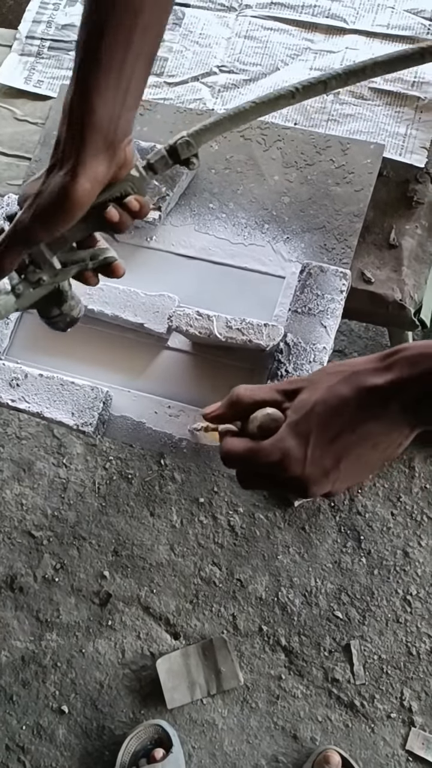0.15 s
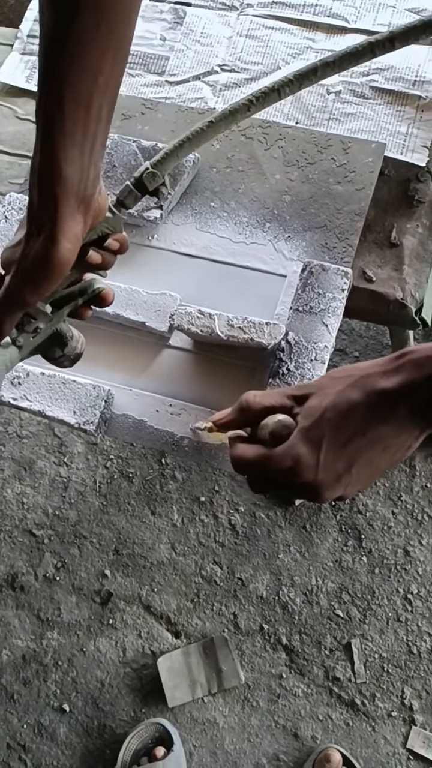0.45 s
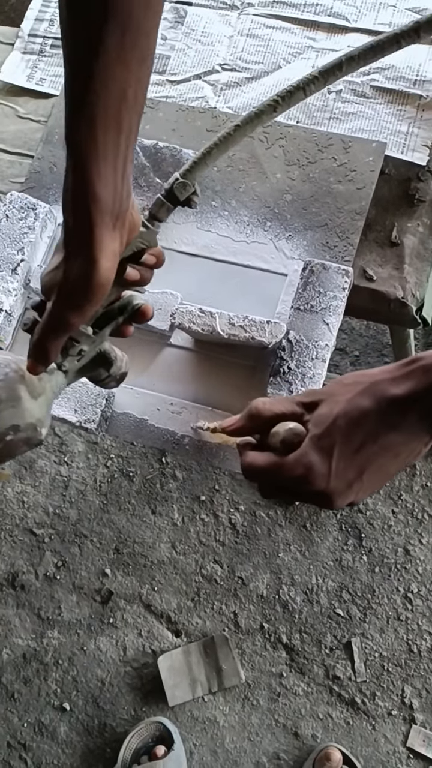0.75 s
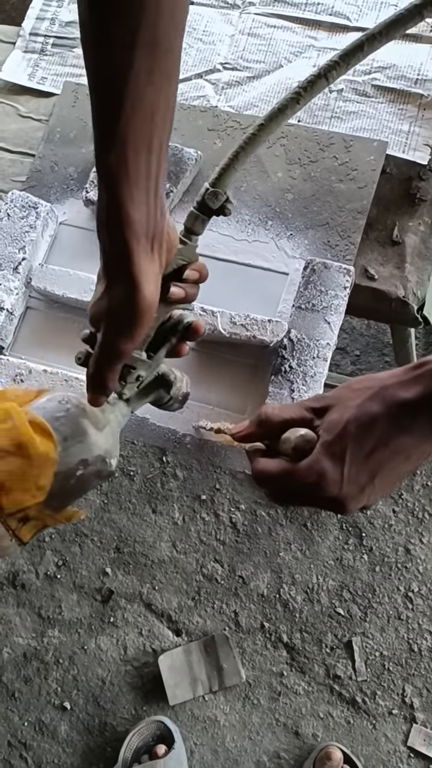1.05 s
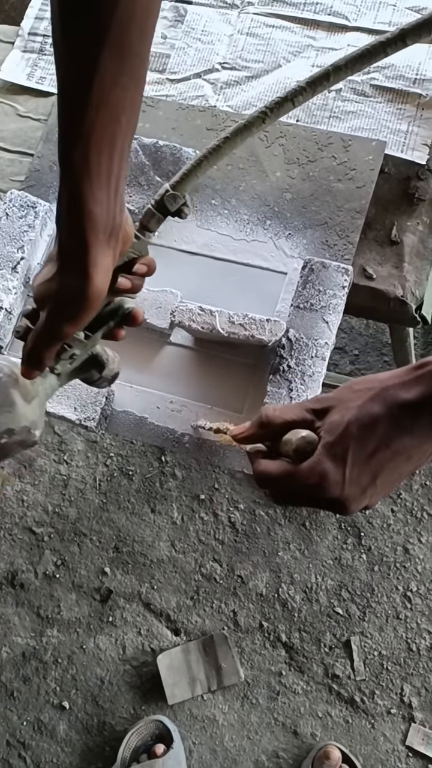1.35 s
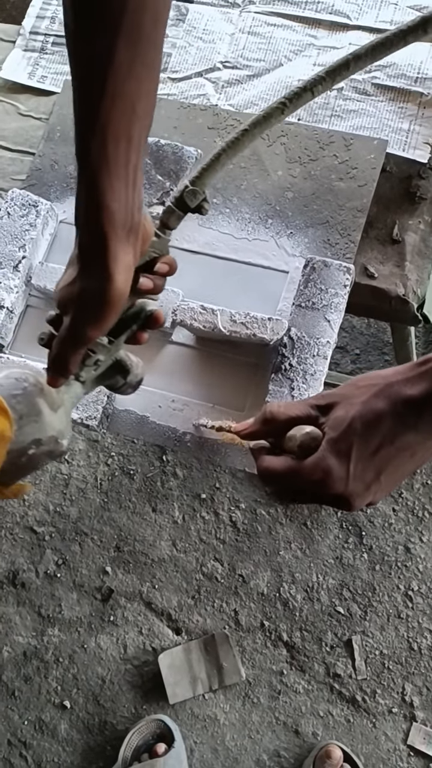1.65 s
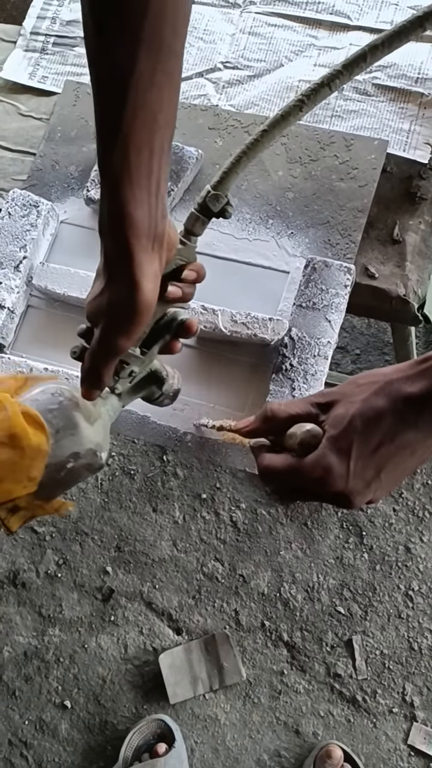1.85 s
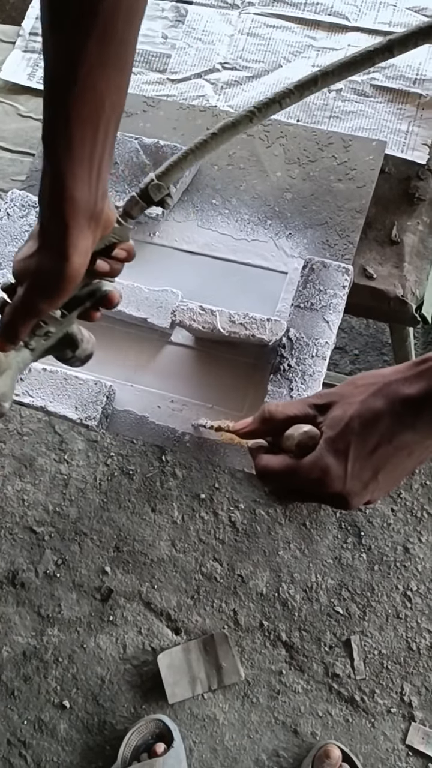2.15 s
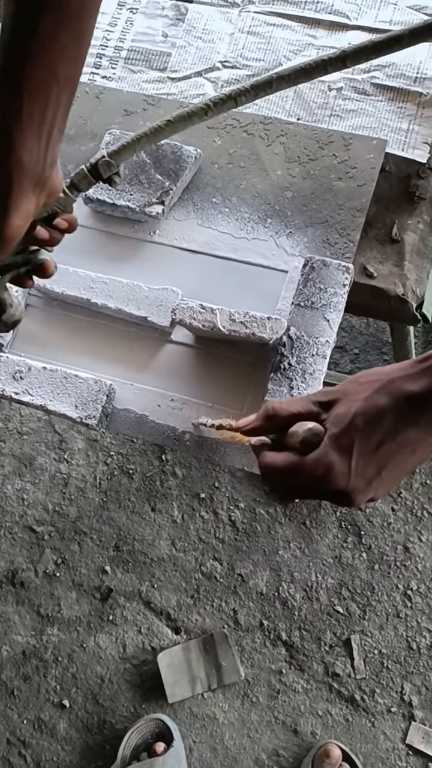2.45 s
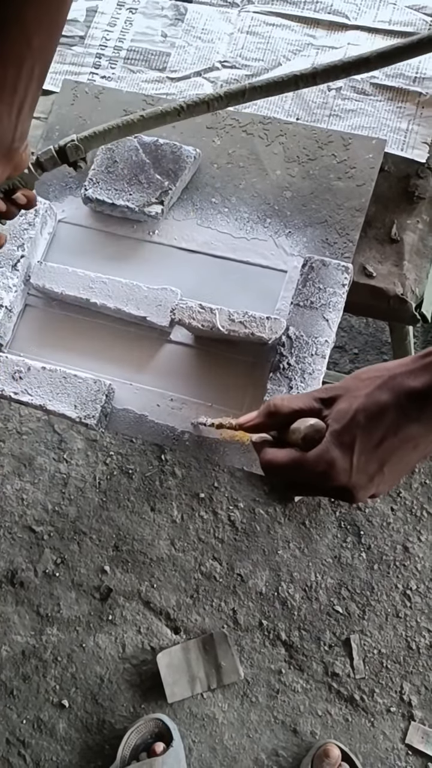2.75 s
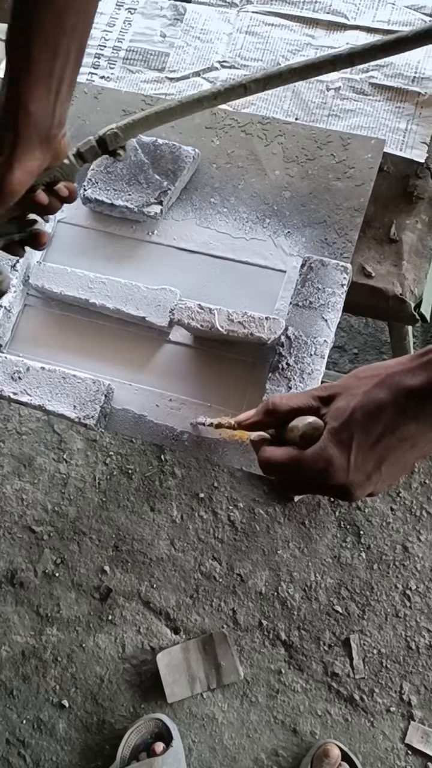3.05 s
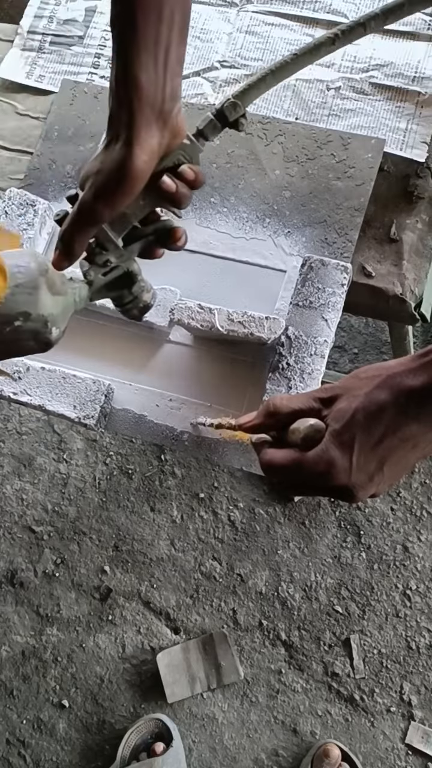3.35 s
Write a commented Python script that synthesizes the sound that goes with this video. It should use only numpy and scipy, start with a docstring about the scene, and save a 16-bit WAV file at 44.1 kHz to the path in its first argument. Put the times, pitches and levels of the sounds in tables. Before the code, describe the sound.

A compressed-air spray gun hisses thinly throughout, gives two short puffs late on and a final swelling burst; behind it, far dull blows on a hollow panel echo through a large workshop, heard in stereo.

```python
"""A spray gun leaks a steady hiss in a large workshop: shaped noise, two short puffs, one last swelling burst.
Far off, out of sight, ten dull blows and a weak rebound fall on a hollow panel: the hall smears each into
a swell of noise echoes with a beating ring of decaying sines. Early on come a soft nearby thud (damped sines),
a fading noise hum and a thin whistle (one unsteady sine), over the room tone of the shop.
It is heard at two microphone ports, where most of the noise is alike only in the bass."""
import sys
import numpy as np
from scipy import signal
from scipy.fft import rfft, irfft, next_fast_len
from scipy.io import wavfile
from scipy.ndimage import uniform_filter1d, map_coordinates

SR = 44100
rng = np.random.default_rng(int(sys.argv[2]) if len(sys.argv) > 2 else 0)


def generate_wav(sig):
    """Save sig (samples, or channels by samples) to the path in sys.argv[1] as 16-bit PCM at SR."""
    pcm = np.round(np.clip(np.atleast_2d(sig).T, -1, 1) * 32767).astype(np.int16)
    wavfile.write(sys.argv[1], SR, pcm)


N = 154350  # 3.5 s

# Leak at the gun. Each row: time in seconds, level in dB before the common lift.
LEAK_LEVEL = [(0.0, -53.5), (0.17, -52), (0.31, -52.5), (0.74, -50), (2.99, -49.5), (3.22, -50.5),
              (3.5, -48.5)]
# Spectrum of the leak. Each row: frequency in Hz, relative density in dB.
LEAK_COLOUR = [(900, -29), (1500, -15), (3000, -12.5), (5500, -12), (7000, -5), (8500, -5), (8700, -18.5),
               (10800, -10.5), (12500, -22.5), (15000, -9), (15800, -20)]
LEAK_LIFT_DB = 9
# Short puffs of air. Each row: start in seconds, level in dB before the fade-in, t60 in seconds.
PUFFS = [(2.075, -35.5, 0.92), (2.7, -35.5, 0.46)]
# Spectrum of the puffs. Each row: frequency in Hz, relative density in dB.
PUFF_COLOUR = [(1300, -36), (1900, -3), (2500, -6.5), (3500, -2.5), (5000, -8), (6500, 0), (8500, 2),
               (8800, -13.5), (15700, -24)]
# Closing burst of air. Each row: time in seconds, level below the split in dB, level above it in dB.
BURST_LEVELS = [(2.93, -56, -58), (2.955, -57, -44), (3.01, -51, -37), (3.03, -36.5, -34.5),
                (3.07, -40, -33), (3.105, -35, -28.5), (3.18, -34.5, -28), (3.25, -36.5, -31),
                (3.33, -37.5, -36), (3.41, -39, -38.5), (3.5, -45.5, -40.5)]
# Spectrum of the burst within each part. Each row: frequency in Hz, relative density in dB.
BURST_COLOUR = [(530, -60), (900, -15), (955, -17), (1200, -12.5), (1890, -1.5), (2520, -1), (4110, 2),
                (4690, -3), (7130, 1.5), (8530, -3.5), (9060, -15), (9970, -13), (15700, -25)]
SPLIT_HZ = 2500

# Far blows. Each row: start in seconds, body level in dB, treble tilt in dB per octave,
# ring level in dB, lateness of the ring in seconds, hold in seconds.
BLOWS = [(0.43, -23.5, 0.8, -30, .004, .13), (.736, -21.5, 0.2, -26, 0.0024, 0.14),
         (1.022, -23.5, 0.4, -27, 0.0075, 0.13), (1.309, -24, -0.7, -30, 0.0062, 0.13),
         (1.609, -28, -1.8, -34.5, -0.0012, 0.13), (1.857, -28, 0.3, -36, -0.0024, 0.15),
         (2.114, -28, 0.1, -33, .004, 0.17), (2.361, -27, 0.1, -34, -.004, 0.12),
         (2.591, -26, 0, -33, -0.0077, 0.16), (2.718, -33, 2, -42, .001, 0.023),
         (2.803, -27.5, -1.4, -31.5, .006, 0.13)]
# Spectrum of the blows. Each row: frequency in Hz, relative density in dB.
BLOW_COLOUR = [(53, -56), (90, -29), (241, -16), (339, -11), (386, -12), (429, -10), (488, -11.5),
               (703, -11), (1450, -19), (2010, -18), (2540, -27.5), (7240, -30.5), (9170, -46),
               (15000, -51)]
# Broad resonances in the echoes. Each row: frequency in Hz, half width in Hz, lift in dB.
BOOMS = [(1164, 13.3, 8), (1240, 67, 7.5), (1947, 59, 5), (2830, 190, 5), (743, 110, 3.5)]
# Build-up in the hall. Each row: frequency in Hz, time constant in seconds.
HALL_RISE = [(200, 0.01), (800, 0.037), (3000, 0.017), (9000, 0.01)]
# Decay of the hall while a blow holds. Each row: frequency in Hz, t60 in seconds.
HALL_DECAY = [(150, 0.52), (400, 0.85), (900, 0.61), (2500, 0.66), (8000, 1)]
ECHO_SPIKES_DB = 5  # scatter of size from one echo sample to the next
FRONT_DB, FALL_DB_PER_S = -12.5, 18  # first arrival under the swell; extra loss after the hold

# Panel modes, with a close pair of opposite polarity that beats.
# Each row: frequency in Hz, relative level in dB, t60 in seconds before the extra fall, polarity.
PANEL = [(426, -2, 1.5, 1), (440, -.5, 1.5, -1), (300, -9, .35, -1), (349, -5, .5, 1), (392, -10, .4, -1),
         (567, -16, .5, 1), (634, -16, .5, -1), (710, -14, .5, 1), (786, -16, .45, -1)]
RING_RISE_S, RING_FALL_DB_PER_S = 0.013, 224
RING_LEAD, RING_WANDER = 0.3, 0.6  # radians: opposed shift at the two ports, shared wavering
RING_FLUTTER_DB, RING_SCATTER_DB = 1.2, 1  # wavering of size; scatter of each mode at each port

# Modes of the nearby thud. Each row: frequency in Hz, relative level in dB, t60 in seconds.
THUD = [(150, -9, .4), (182, -1, .3), (240, -6, .25), (345, -4, .15), (430, -10, .1), (515, -8, .12)]
THUD_S, THUD_DB, THUD_RISE_S, THUD_CUT_HZ = 0.119, -27, 0.0015, 115

# Whistle. Each row: time in seconds, rms level in dB before the common lift and wavering.
WHISTLE_LEVEL = [(.25, -68), (.266, -51), (.3, -48), (.34, -49), (.36, -56), (.372, -64), (.386, -56),
                 (.42, -57), (.43, -61), (.445, -57), (.47, -64)]
WHISTLE_HZ, WHISTLE_LIFT_DB = 3470, 4

# Rough hum dying away. Each row: time in seconds, rms level in dB.
HUM_LEVEL = [(0, -49.5), (.06, -46.5), (.115, -44), (.15, -57), (.25, -69)]
# Its bands. Each row: frequency in Hz, half width in Hz, relative level in dB.
HUM_BANDS = [(880, 60, 0), (2110, 25, -8)]

# Spectrum of the room tone. Each row: frequency in Hz, relative density in dB.
SHOP_COLOUR = [(25, -51), (55, -43), (100, -9.5), (180, -3), (350, -2.5), (500, -9), (850, -6.5),
               (1100, -11.5), (2200, -17.5), (4000, -19.5), (8000, -29)]
# Its course before wavering. Each row: time in seconds, level in dB.
SHOP_LEVEL = [(0.0, -40.5), (0.35, -44), (0.93, -44.5), (2.0, -43.5), (2.64, -41.5), (3.5, -43.5)]

# Likeness of the two sides of the noise. Each row: frequency in Hz, left-right correlation from 0 to 1.
ALIKE = [(40, 0.62), (90, 0.95), (200, 0.99), (350, 0.82), (550, 0.13), (1500, 0.16), (4000, 0.067),
         (15000, 0.067)]
# Colour of the microphone ports. Each row: frequency in Hz, left over right in dB.
PORTS = [(60, -2.5), (140, 0.5), (400, -2.3), (800, 1.5), (1800, -2.5), (3000, 0.9), (5500, 2.5), (7200, 8),
         (7900, 5), (8400, -11), (9500, -4.5), (12000, 2.5), (15000, 0)]
LEFT_LEAD_S, LEAD_FROM_HZ, TOP_HZ = 0.0004255, 595, 15790


def amp(db):
    """Gain of a level in dB."""
    return 10 ** (np.asarray(db) / 20)


def unit(x):
    """Signal scaled to rms 1 over both sides together."""
    return x / np.sqrt(np.mean(x ** 2) + 1e-20)


def along(points, hz):
    """Value at hz between (Hz, value) points on a log frequency axis."""
    f, v = np.transpose(points)
    return np.interp(np.log(hz + 1), np.log(f + 1), v)


def level(rows):
    """Gain per sample from (s, dB) rows; -120 dB outside them, but a row near the end holds on."""
    s, db = np.transpose(rows)
    after_db = db[-1] if s[-1] > 3.4 else -120
    return amp(np.interp(np.arange(N) / SR, s, db, -120, after_db))


def wobble(rate):
    """Smooth random curve through `rate` random knots a second."""
    knots = rng.standard_normal(int(N * rate / SR) + 4)
    return map_coordinates(knots, [np.arange(N) * rate / SR])


def filtered(x, response):
    """Signal multiplied in the spectrum by a response of frequency in Hz."""
    m = next_fast_len(N + 8192)  # room for the tail
    spectrum = rfft(x, m) * response(np.fft.rfftfreq(m, 1 / SR))
    return irfft(spectrum, m)[..., :N]


def spread(pair):
    """Two unrelated signals mixed as mid and side, so left and right correlate as ALIKE says."""
    def mid_side(hz):
        turn = np.arccos(np.clip(along(ALIKE, hz), -1, 1)) / 2
        return np.array([np.cos(turn), np.sin(turn)])

    mid, side = filtered(pair, mid_side)
    return np.array([mid + side, mid - side])


def rush(colour, patchy_db):
    """Coloured stereo noise of rms 1, uneven in patches of time and frequency shared by both sides."""
    z = signal.stft(rng.standard_normal((2, N)), nperseg=512)[2]
    across_bins = uniform_filter1d(rng.standard_normal(z.shape[1:]), 6, 0)
    patches = unit(uniform_filter1d(across_bins, 12, 1))
    pair = signal.istft(z * amp(patchy_db * patches), nperseg=512)[1][:, :N]
    coloured = filtered(pair, lambda hz: amp(along(colour, hz)))
    return unit(spread(coloured))


def gun():
    """Escaping air as turbulent noise: the leak, two puffs, and a burst whose lower part lingers."""
    return gun_leak() + gun_puffs() + gun_burst()


def gun_leak():
    """Steady hiss of escaping air with a slightly wavering level."""
    gain = level(LEAK_LEVEL) * amp(LEAK_LIFT_DB + 0.28 * wobble(5.7))
    return gain * rush(LEAK_COLOUR, patchy_db=2.14)


def gun_puffs():
    """Short puffs of air that open over 20 ms and decay exponentially."""
    t = np.arange(N) / SR
    gain = 0
    for start, db, t60 in PUFFS:
        opening = np.clip((t - start) / 0.02, 0, 1)
        gain = gain + amp(db - 60 * abs(t - start) / t60) * opening
    return gain * rush(PUFF_COLOUR, patchy_db=0.0)


def gun_burst():
    """Swelling rush of air, its spectrum split in two parts that follow their own levels."""
    air = rush(BURST_COLOUR, patchy_db=0.9)
    low = filtered(air, lambda hz: 1 / (1 + (hz / SPLIT_HZ) ** 6))
    s, low_db, high_db = np.transpose(BURST_LEVELS)
    low_gain = level(np.column_stack([s, low_db]))
    high_gain = level(np.column_stack([s, high_db]))
    return low_gain * unit(low) + high_gain * unit(air - low)


def blow_colour(hz):
    """Gain of the blow's spectrum with its broad resonances."""
    lift_db = sum(db / (1 + ((hz - centre) / width) ** 2) for centre, width, db in BOOMS)
    return amp(along(BLOW_COLOUR, hz) + lift_db)


def blow_echoes():
    """Dense uneven echoes of each far blow swell and die in the hall, each band at its own speed."""
    spikes = amp(ECHO_SPIKES_DB * rng.standard_normal(N))
    echoes = unit(rng.standard_normal((2, N)) * spikes)
    hz, t, z = signal.stft(echoes, SR, nperseg=256, noverlap=192)
    hz, power = hz[:, None], 0
    for start, body_db, tilt_db, _, _, hold in BLOWS:
        u = np.clip(t - start, 0, None)
        swell = (1 - np.exp(-u / along(HALL_RISE, hz))) ** 2
        front = amp(FRONT_DB) * (u > 0) * (hz < 1100)
        after_hold = amp(-FALL_DB_PER_S * np.clip(u - hold, 0, None))
        band_db = body_db + tilt_db * np.log2(hz / 700 + 0.1)
        decay = amp(band_db - 60 * u / along(HALL_DECAY, hz))
        power = power + ((swell + front) * after_hold * decay) ** 2
    shaped = signal.istft(z * np.sqrt(power), SR, nperseg=256, noverlap=192)[1][:, :N]
    mean = np.sqrt(np.mean(blow_colour(np.linspace(1, SR / 2, 4000)) ** 2))
    return spread(filtered(shaped, lambda f: blow_colour(f) / mean))


def panel_ring():
    """Every blow rings the panel's modes; the hall makes them waver and reach the two ports unalike."""
    out, t = np.zeros((2, N + SR)), np.arange(int(0.6 * SR)) / SR
    hz, db, t60, polarity = np.transpose(PANEL)[..., None]
    wander, flutter = (np.pad(wobble(30), (0, SR)) for _ in range(2))
    per_mode = (2,) + hz.shape  # ports, modes, time
    for start, _, _, ring_db, late, hold in BLOWS:
        at = round((start + late) * SR)
        here = slice(at, at + len(t))
        scatter_db = RING_SCATTER_DB * rng.standard_normal(per_mode)
        size = amp(db + scatter_db - 60 * t / t60)
        # phase is more random in the higher modes
        phase = np.clip(hz / 150 - 2.7, 0.15, 3) * rng.uniform(-1, 1, per_mode)
        phase = phase + RING_LEAD * rng.normal() * np.array([[[1]], [[-1]]])
        phase = phase + RING_WANDER * wander[here]
        ring = (polarity * size * np.sin(2 * np.pi * hz * t + phase)).sum(axis=1)
        # the extra fall after the hold stops at 14 dB
        fall_db = np.clip(RING_FALL_DB_PER_S * (t - hold), 0, 14) + RING_FLUTTER_DB * flutter[here]
        out[:, here] += amp(ring_db - fall_db) * ring * (1 - np.exp(-t / RING_RISE_S))
    return out[:, :N]


def thud():
    """Something soft set down on a board nearby: damped modes of alternating sign, deep bass cut."""
    t = np.clip(np.arange(N) / SR - THUD_S, 0, None)
    ring = 0
    for k, (hz, db, t60) in enumerate(THUD):
        ring = ring + (-1) ** k * amp(db - 60 * t / t60) * np.sin(2 * np.pi * hz * t)
    knock = amp(THUD_DB) * ring * (1 - np.exp(-t / THUD_RISE_S))
    return filtered(knock, lambda f: 1 / (1 + (THUD_CUT_HZ / (f + 1)) ** 6))


def whistle():
    """A thin sine, unsteady in pitch and level, that fades in the hall; the ports differ in phase."""
    phase = 2 * np.pi * np.cumsum(WHISTLE_HZ + 9 * wobble(35)) / SR
    gain = level(WHISTLE_LEVEL) * amp(WHISTLE_LIFT_DB + 2.0 * wobble(48))
    return np.sqrt(2) * gain * np.sin([phase - 0.7, phase + 0.7])


def hum():
    """Two rough bands of noise fading at the start, unrelated at the two ports."""
    def bands(f):
        return sum(amp(db) / (1 + ((f - hz) / width) ** 4) for hz, width, db in HUM_BANDS)

    return level(HUM_LEVEL) * unit(filtered(rng.standard_normal((2, N)), bands))


def room_tone():
    """Background of the shop: mostly low coloured noise with a slowly wavering level."""
    return level(SHOP_LEVEL) * amp(0.7 * wobble(6)) * rush(SHOP_COLOUR, patchy_db=1.2)


def scene():
    """All sources over the room tone."""
    return gun() + blow_echoes() + panel_ring() + thud() + whistle() + hum() + room_tone()


def record(dry):
    """Each port has its own colour, the left hears the treble slightly earlier; a band limit on top."""
    side = np.array([[1], [-1]])  # left, right: each takes half of the difference

    def port(hz):
        colour = amp(side * along(PORTS, hz) / 2)
        lead_s = LEFT_LEAD_S / (1 + (LEAD_FROM_HZ / (hz + 1)) ** 4)
        return colour * np.exp(1j * np.pi * hz * side * lead_s)

    return filtered(dry, lambda hz: port(hz) * (hz < TOP_HZ))


dry = scene()
out = record(dry)
generate_wav(out)
```